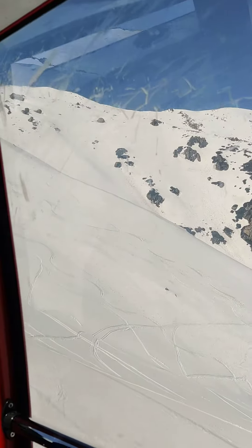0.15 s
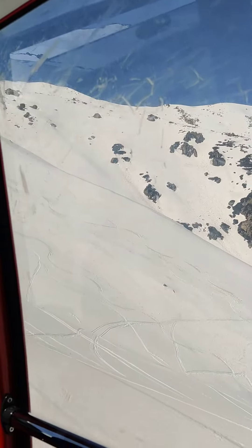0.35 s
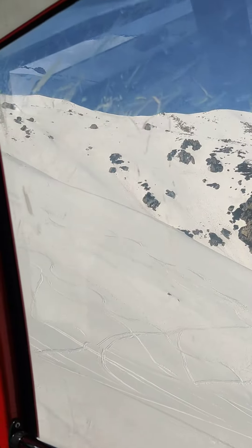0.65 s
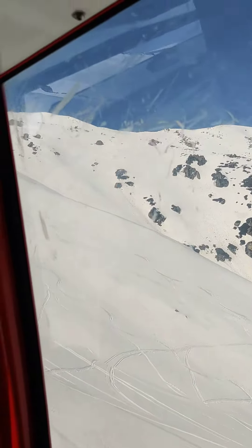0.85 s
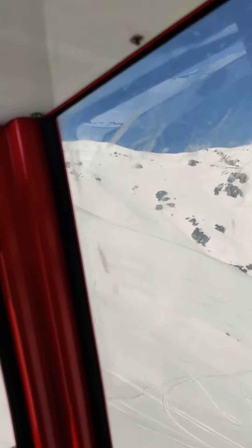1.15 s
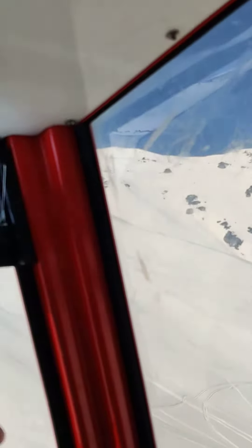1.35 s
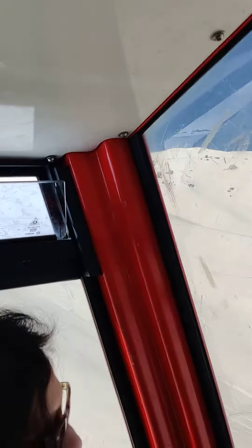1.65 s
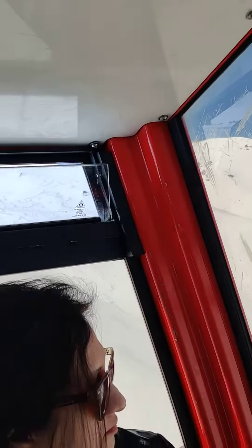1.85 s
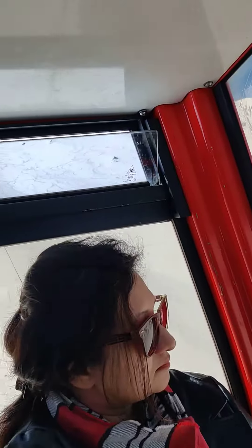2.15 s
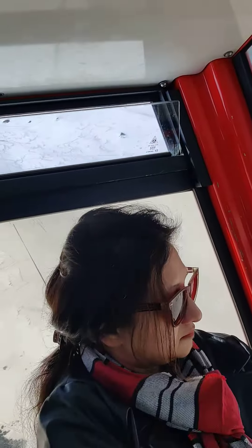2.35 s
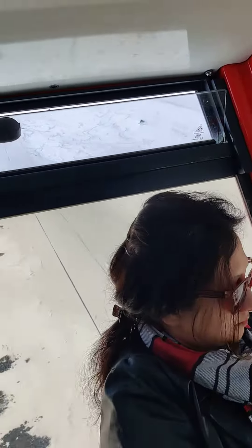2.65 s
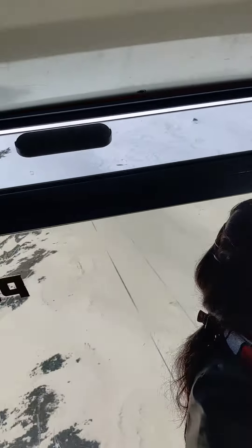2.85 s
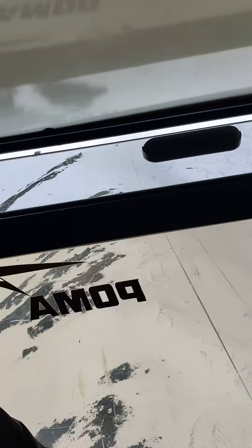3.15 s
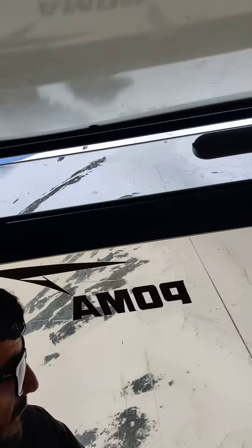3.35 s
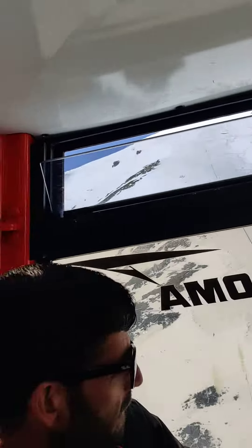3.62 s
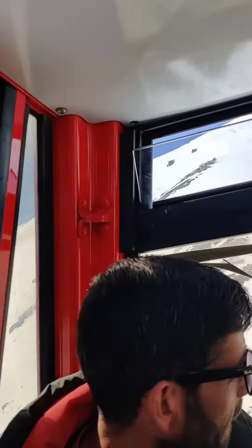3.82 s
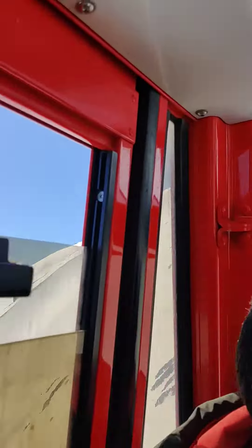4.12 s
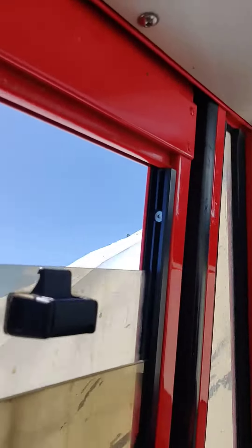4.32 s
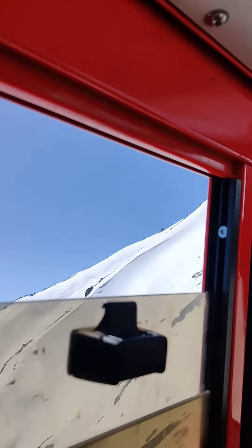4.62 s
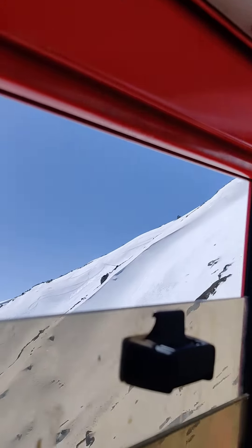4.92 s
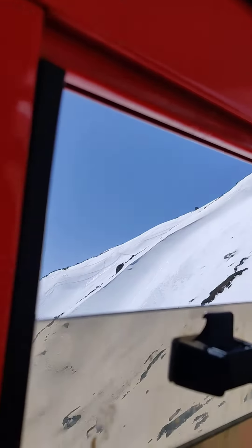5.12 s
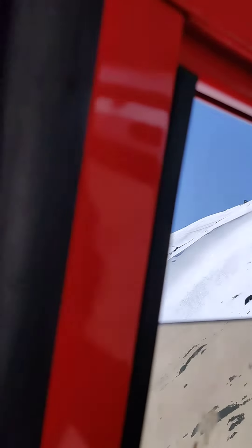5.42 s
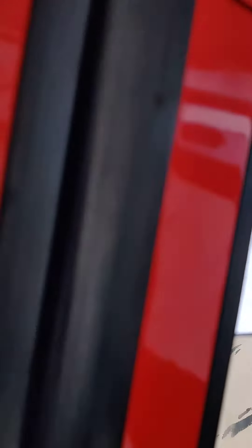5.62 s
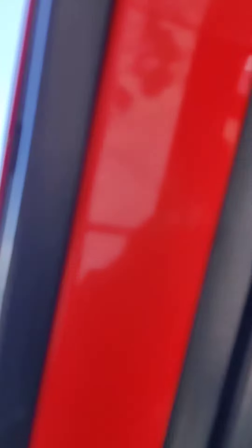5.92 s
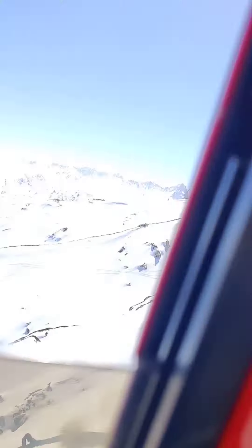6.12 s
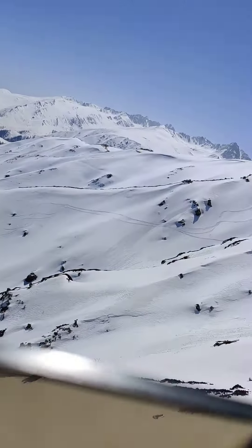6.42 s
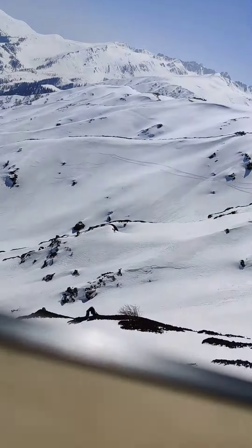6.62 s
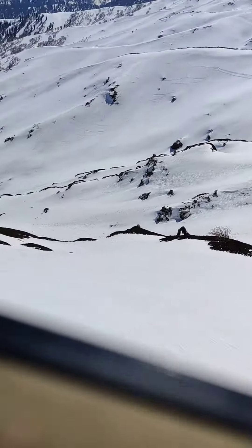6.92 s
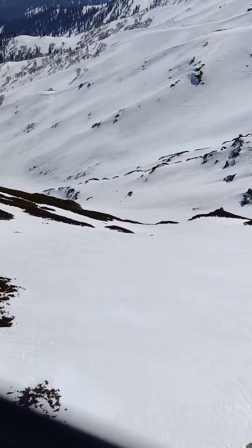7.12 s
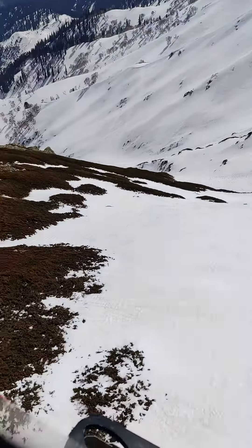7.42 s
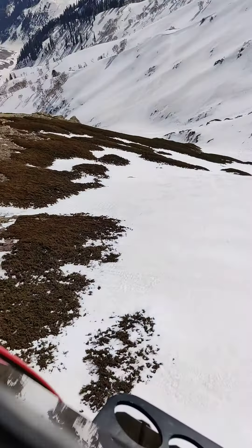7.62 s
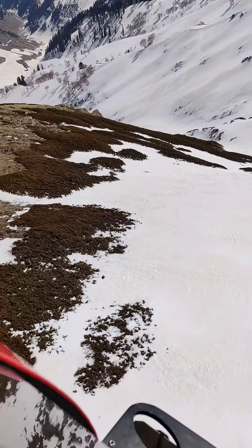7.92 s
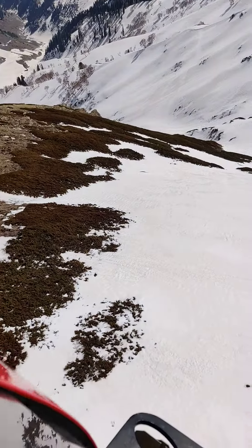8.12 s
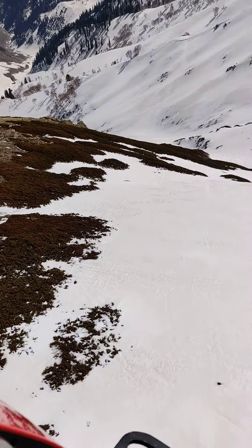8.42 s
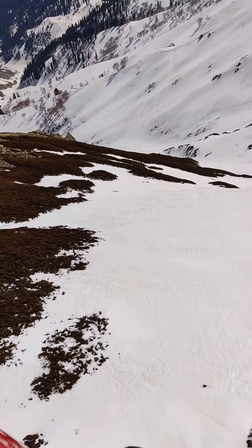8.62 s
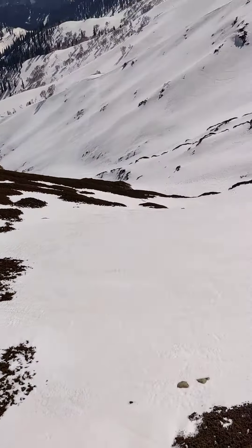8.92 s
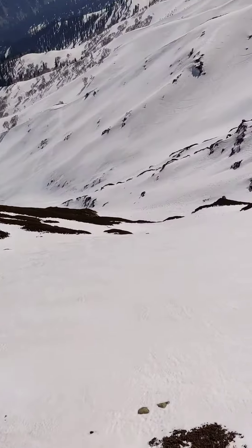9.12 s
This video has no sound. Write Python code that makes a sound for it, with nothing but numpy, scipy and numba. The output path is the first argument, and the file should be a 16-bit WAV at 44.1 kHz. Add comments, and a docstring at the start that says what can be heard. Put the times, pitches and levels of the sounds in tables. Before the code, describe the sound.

Low droning cabin hum pulsing almost three times a second, with close cloth rubs, small clicks, faint buzzing and late dull wind buffets.

```python
"""A deep hum throbs once a wheel turn, over a rumble of panels, inside a cable car cabin: the strands of the
rope running over the tower wheels shake it. Faint overtone lines sing above. Close to the phone's two microphone
ports jackets rustle, tick and whistle: filtered noise. The loose pane buzzes, knocked in step with the hum;
later the phone is held out of the window, where wind thumps, soft pushes of noise, on its left port."""
import sys
import numpy as np
from scipy import signal
from scipy.fft import dct
from scipy.io import wavfile
from scipy.ndimage import uniform_filter1d, minimum_filter1d
from numba import njit

SR = 44100
rng = np.random.default_rng(int(sys.argv[2]) if len(sys.argv) > 2 else 0)


def inscribe(sig):
    """Save sig as 16-bit PCM at rate SR to the path in sys.argv[1].

    A 1-D sig is mono; a 2-D sig holds one channel per row.
    Samples are clipped to [-1, 1] before scaling.
    """
    pcm = np.round(np.clip(np.atleast_2d(sig).T, -1, 1) * 32767)
    wavfile.write(sys.argv[1], SR, pcm.astype(np.int16))


N = 408366
OPPOSITE = np.array([[1], [-1]])  # left and right in opposite sense


def undb(db):
    """Decibels to gain."""
    return 10 ** (np.asarray(db) / 20)


def unit(x):
    """Scaled to rms 1."""
    return x / np.sqrt(np.mean(x ** 2))


def curves(table):
    """The columns of a table, after its times, as sample-rate lines."""
    s, *columns = np.transpose(table)
    return [np.interp(np.arange(N) / SR, s, c) for c in columns]


def band(x, hz, width):
    """A fixed resonance."""
    return signal.lfilter(*signal.iirpeak(min(hz, .45 * SR), hz / width, SR), x)


def walk(rate):
    """Random levels held 1 / rate s and slewed twice; spread near 1."""
    hold = int(SR / rate)
    steps = np.repeat(rng.standard_normal(N // hold + 1), hold)
    return 1.3 * uniform_filter1d(uniform_filter1d(steps, hold), hold)[:N]


def pan(x, db):
    """Left and right, db apart."""
    return x * undb(np.array([db, -db]) / 2)


def shaken(modes, apart, flicker_db):
    """Steep resonances driven by noise, each flickering alone; apart = share that differs between the ports."""
    out = 0
    for hz, width, db in modes:
        mid, side = (unit(band(band(rng.standard_normal(N), hz, width), hz, 1.41 * width)) for _ in range(2))
        out = out + undb(db + flicker_db * walk(3)) * (mid + apart * side * OPPOSITE)
    return unit(out)


# the rope hum in the cabin: time_s, level_db, throb_depth_db (gain of the side lines)
HUM = [(0, -11.5, -3), (.45, -13, -13.5), (.7, -7, -20), (1.0, -7, -14.5), (1.3, -8, -14), (2.2, -8.5, -9),
       (2.5, -6.5, -17), (2.8, -4, -18), (3.2, -7, -11), (3.7, -7, -10.5), (4.2, -8.5, -12.5),
       (4.6, -5.5, -17), (4.9, -10, -10.5), (5.35, -9, -14.5), (5.57, -14, -9), (5.8, -10, -8),
       (6.3, -8.5, -16.5), (7.0, -10.5, -11.5), (7.6, -11, -16), (8.35, -12, -13.5), (8.65, -15, -13),
       (9.17, -17, -16), (9.21, -19.5, -18), (9.26, -46, -15)]
# side lines that the uneven wheel adds: wheel_turns away from the hum (rounded when played), share
WHEEL_LINES = [(-1, 1), (-1.5, 0.18), (-3, 0.069), (1, -0.39)]
# the phone turning its right port to the cabin: time_s, left_minus_right_db of the hum (other layers scale it)
TURN = [(0, -3), (4.5, -2), (6.0, -4.5), (7.2, -8), (8.1, -11), (9.26, -11)]
# the rope surges and slackens: the hum's pitch swings slowly about its mean
HUM_HZ, SURGE_HZ, SURGE_PERIOD_S, FASTEST_S = 72.83, .52, 4.9, .15
WHEEL_TURNS_PER_S, THROB_ANCHOR_S = 2.703, 0.439
# the throb drifts ahead and behind
WHEEL_LEAD_TURNS, WHEEL_LEADS_MOST_S, WHEEL_LEAD_PERIOD_S = 0.13, 5.3, 4.44


def hum():
    """One strand per cycle: a near sine with a rough skirt, throbbing with the wheel. Also gives the cycles."""
    t = np.arange(N) / SR
    db, throb_db = curves(HUM)
    hz = HUM_HZ + SURGE_HZ * np.cos(2 * np.pi * (t - FASTEST_S) / SURGE_PERIOD_S)
    cycles = np.cumsum(hz + .3 * walk(14)) / SR
    lead = WHEEL_LEAD_TURNS * np.cos(2 * np.pi * (t - WHEEL_LEADS_MOST_S) / WHEEL_LEAD_PERIOD_S)
    wheel = 2 * np.pi * (WHEEL_TURNS_PER_S * (t - THROB_ANCHOR_S) + lead)
    skirt = unit(band(band(rng.standard_normal(N), 72, 19), 72, 19))
    lag = .07 * walk(1.3) * OPPOSITE  # radians: now one port leads, now the other
    strand = 2 * np.pi * cycles + lag
    sides = sum(share * np.sin(strand + round(turns) * wheel) for turns, share in WHEEL_LINES)
    tone = np.sqrt(2) * (np.sin(strand) - undb(throb_db) * sides) + undb(-20.5) * skirt
    return tone * pan(undb(db), curves(TURN)[0]), cycles


# levels of the cabin's parts: time_s, sway_db (below the hum), panels_db (just above the hum),
# upper_panels_db (before a fixed trim), roof_db
RUMBLE = [(0, -24, -28, -39.5, -52.5), (.9, -24, -28, -38.5, -46.5), (1.6, -23, -24, -39.5, -50.5),
          (2.3, -23.5, -25, -39, -51.5), (2.7, -26, -34.5, -37.5, -53), (3.3, -26.5, -31.5, -36.5, -53.5),
          (4.0, -27, -35.5, -39, -53), (5.0, -29.5, -35, -35.5, -50.5), (5.5, -29, -38, -36.5, -52),
          (6.0, -27.5, -38, -35, -48), (6.7, -27.5, -39, -37.5, -51), (7.6, -29.5, -35, -38, -53.5),
          (9.26, -30.5, -41, -42, -48.5)]
# resonances of the swaying cabin: pitch_hz, width_hz, relative_level_db
SWAY = [(31.3, 37.3, -0.5), (40, 27, -5)]
# resonances of the panels just above the hum: pitch_hz, width_hz, relative_level_db
PANELS = [(88, 37, -4.5), (118.7, 12, -8), (128.8, 10, -1.5)]
# resonances of the upper panels: pitch_hz, width_hz, relative_level_db
UPPER_PANELS = [(183, 20, -4), (200, 30, -11), (258, 58, -2.5), (294.7, 33, -5.5), (362.5, 42, -10.5),
                (444.3, 45, -11.5)]
# resonances of the roof: pitch_hz, width_hz, relative_level_db
ROOF = [(491.5, 40, 2), (541, 57, -4), (585, 46, -7), (695, 62, -15.5), (775.5, 52, -12.5)]


def rumble():
    """The cabin sways and its panels ring, as noise in resonances; it turns to the right port as the hum does."""
    sway_db, panel_db, upper_db, roof_db = curves(RUMBLE)
    turn_db, = curves(TURN)
    sway = undb(sway_db) * shaken(SWAY, apart=0.16, flicker_db=2.0)
    panels = undb(panel_db) * shaken(PANELS, apart=0.1, flicker_db=2.5)
    upper = undb(upper_db - 2.5) * shaken(UPPER_PANELS, apart=0.49, flicker_db=3.0)
    roof = undb(roof_db) * shaken(ROOF, apart=0.49, flicker_db=2.5)
    return pan(sway + panels, 1.4 * turn_db) + pan(upper + roof, 0.8 * turn_db)


# narrow lines above the hum, each louder for one spell:
# pitch_hz, width_hz, level_db (of the tone, outside the spell), spell_middle_s, spell_half_length_s, spell_gain_db
SINGING = [(144.44, 9, -38, 7.1, .8, 5), (225.2, 7, -51, 4.5, 1.2, 13.5), (291.2, 10, -50, 1.7, 2.1, 9),
           (364.4, 14, -58.5, .7, 0.42, 9), (437.5, 7, -56, 3.57, 0.27, 7.5)]


def singing():
    """Narrow lines above the hum: a wavering tone in a little band of noise."""
    out, t = 0, np.arange(N) / SR
    for hz, width, db, middle, half, spell_db in SINGING:
        cycles = np.cumsum(hz + 0.2986 * width * walk(9)) / SR
        tone = np.sqrt(2) * np.sin(2 * np.pi * cycles) * undb(2.0 * walk(6))
        spell = np.exp(-((t - middle) / half) ** 4)
        level_db = db + spell_db * spell + 1.2 * walk(4) + 3.2 * walk(13)
        noise = shaken([(hz, width, 0)], apart=0.12, flicker_db=0.1)
        out = out + undb(level_db) * (tone + .45 * noise)
    return pan(out, 0.56 * curves(TURN)[0])


# jackets rubbing, one row a rub: loudest_s, rise_s, fall_s, hiss_db, swish_db
# (swish is the hollow sound of the sleeves; both levels are before the fixed gains in rustle)
RUBS = [(.23, 0.15, 0.6, -56, -58.5), (.54, 0.12, 0.06, -54, -57.5), (.72, 0.11, .3, -54.5, -57.5),
        (.95, .1, 0.069, -57.5, -59), (1.13, .06, .1, -56, -61), (1.35, 0.44, .3, -59, -59.5),
        (1.54, .22, .25, -51, -54), (1.95, 0.68, 1, -53, -57), (2.31, 0.018, 0.17, -47.5, -50),
        (2.43, .08, 0.073, -53, -58), (3.03, 0.2, 0.38, -49.5, -51.5), (3.36, 0.087, 0.039, -52, -51),
        (3.69, 0.13, 0.12, -53.5, -53.5), (3.86, .15, 0.19, -50, -53), (4.1, 0.18, 0.32, -46.5, -49.5),
        (4.33, 0.17, .1, -51, -53), (4.64, 0.25, 0.15, -53, -54), (5.02, 0.19, 0.25, -56.5, -57),
        (5.92, 0.42, 0.37, -60, -61), (6.26, .08, 0.053, -63, -64), (6.62, .2, 0.43, -55.5, -56.5),
        (6.85, 0.066, 0.33, -53.5, -52.5), (7.06, 0.079, 0.18, -47.5, -53.5), (7.3, 0.22, 0.28, -58, -55.5),
        (7.56, 0.26, 0.2, -52.5, -54.5), (7.72, 0.15, .08, -57, -58), (8.1, 0.23, 0.42, -59.5, -58.5),
        (8.5, .3, 0.63, -63, -60), (9.0, .1, .3, -70.5, -61.5)]
RUB_SWELL_DB = 10  # fall over one rise or fall time
STILL_HISS_DB, STILL_SWISH_DB = -67.5, -70  # between rubs, before the same gains


def rubbing():
    """Gain of the hiss and of the swish: each rub swells to its peak and dies away."""
    t, hiss, swish = np.arange(N) / SR, undb(STILL_HISS_DB), undb(STILL_SWISH_DB)
    for s, rise, fall, hiss_db, swish_db in RUBS:
        away = np.maximum((s - t) / max(rise, .005), (t - s) / max(fall, .005))
        shape = undb(-RUB_SWELL_DB * away)
        hiss = np.hypot(hiss, shape * undb(hiss_db))
        swish = np.hypot(swish, shape * undb(swish_db))
    return hiss, swish


def rustle():
    """Cloth on cloth: dense noise grains and a hollow band, unrelated at the ports but swelling together."""
    hiss_gain, swish_gain = rubbing()
    swell = undb(1.1 * walk(25) + 0.87 * walk(60))
    # some 300 grains a second, a few much stronger
    strength = undb(np.minimum(3.9 * rng.exponential(size=N), 14.5))
    crackle = np.where(rng.random(N) < 300 / SR, strength, 0)
    grains = rng.standard_normal((2, N)) * (1 + 6.3 * uniform_filter1d(crackle, size=24))
    hiss = unit(signal.sosfilt(signal.butter(2, 2400., "high", fs=SR, output="sos"), grains))
    upper_hollow = band(band(grains, 2050, 2500), 2050, 3600)
    lower_hollow = band(band(grains, 980, 900), 980, 1500)
    swish = unit(upper_hollow + undb(-1.0) * lower_hollow)
    hiss = pan(hiss * hiss_gain * undb(10.0), .7 * curves(TURN)[0] + 3.1)
    return swell * (hiss + swish * swish_gain * undb(2.5))


# ticks of zips and seams: start_s, peak_db, centre_hz, width_hz, ring_s (60 dB fall of the noise), left_minus_right_db
TICKS = [(.1726, -45, 9050, 9000, 0.017, 0), (.2249, -41.5, 9000, 6000, 0.14, -16),
         (.3546, -42, 3350, 60, 0.06, -6), (0.355, -43, 4100, 503, .04, -11),
         (.385, -41, 7000, 9000, .02, -2), (2.3016, -23.5, 6000, 9000, 0.068, 1),
         (2.616, -38.5, 9000, 8940, 0.018, -11), (3.4953, -32.5, 6020, 8900, 0.035, -3.5),
         (3.6701, -36, 7000, 6030, 0.022, 7), (4.055, -35, 5000, 8000, .02, 1),
         (4.389, -32.5, 7000, 9000, .02, -5), (4.4339, -37, 8500, 2500, .02, -2.5),
         (4.5875, -35, 6950, 8900, .02, -1), (4.874, -37.5, 9030, 9000, 0.022, -1.5),
         (5.269, -39, 8050, 9000, 0.015, -4), (5.394, -56, 3000, 4000, 0.025, 2),
         (5.4628, -46, 2500, 3020, 0.067, -4), (6.8338, -34, 2200, 5000, 0.018, -13),
         (6.8865, -32, 1900, 3000, 0.029, -7), (6.9417, -39, 5400, 1200, .02, -6),
         (7.006, -33, 1000, 1500, 0.023, -3), (7.046, -39, 2500, 6000, 0.023, -7),
         (7.3453, -30, 7100, 5000, 0.018, -3), (7.524, -26.5, 7300, 2970, 0.02, -5),
         (7.75, -32, 12500, 4000, .015, -5), (7.817, -46, 3800, 2000, .015, 0),
         (7.823, -31, 6960, 9000, 0.022, -4), (7.8641, -33.5, 11000, 6000, 0.014, -8),
         (7.8953, -37.5, 5500, 4000, 0.017, -7), (7.8955, -41, 3030, 503, .03, -2),
         (7.969, -49, 2120, 108.5, 0.033, -6), (8.0008, -45.5, 5100, 900, 0.032, 0),
         (8.1732, -32.5, 5500, 8000, 0.042, -3)]


def ticks():
    """Each a sharp click with a short burst of noise behind it, ringing in its own band."""
    out, t = np.zeros((2, N)), np.arange(SR // 8) / SR
    for s, db, hz, width, ring, pan_db in TICKS:
        blow = rng.standard_normal((2, len(t))) * np.exp(-np.log(1000) * t / max(ring, .003))
        blow[:, 0] = 4.1  # the click
        burst = band(band(blow, hz, max(width, 50)), hz, np.clip(2.5 * width, 150, 12000))
        at = int(s * SR)
        out[:, at:at + len(t)] += burst / np.abs(burst).max() * undb([[db + pan_db / 2], [db - pan_db / 2]])
    return out


@njit
def svf(x, hz, width):
    """State-variable band-pass with a moving centre, gain 1 there."""
    y, b, l = np.empty(len(x)), 0., 0.
    for i in range(len(x)):
        g, k = np.pi * hz[i] / SR, width / hz[i]
        g += g * g * g / 3  # near tan(g)
        v = (b + g * (x[i] - l)) / (1 + g * (g + k))
        b, l, y[i] = 2 * v - b, l + 2 * g * v, k * v
    return y


# folds of cloth that whistle as they slide: start_s, end_s, from_hz, to_hz, width_hz (of the first filter), level_db
FOLDS = [(1.399, 2.3, 2070, 2180, 400, -61.5), (2.297, 2.5, 2280, 2190, 480, -62),
         (2.99, 3.42, 1200, 1400, 200, -59), (2.95, 3.2, 1900, 2070, 352, -57),
         (3.72, 4.12, 1220, 1520, 240, -55), (4.22, 4.382, 3200, 4200, 900, -53.5),
         (3.749, 4.195, 1700, 2350, 450, -54.5), (4.0, 4.348, 1600, 1950, 250, -57),
         (3.997, 4.2, 3100, 3300, 900, -52.5)]


def folds():
    """Each fold is a gliding band of noise that swells and stops."""
    out = np.zeros((2, N))
    for start, end, from_hz, to_hz, width, db in FOLDS:
        at, size = int(start * SR), int((end - start) * SR)
        hz = np.linspace(from_hz, to_hz, size)
        air = np.array([svf(svf(rng.standard_normal(size), hz, 1. * width), hz, 2. * width) for _ in range(2)])
        out[:, at:at + size] += unit(air) * signal.windows.tukey(size, .6) * undb(db)
    return out


# spells in which the loose pane buzzes, thin while heard from inside:
# start_s, end_s, level_db (of the ring before its band is cut out), bottom_hz, top_hz
BUZZ = [(4.64, 4.8, -54, 2090, 2360), (4.846, 4.945, -54, 2080, 2350), (5.612, 5.78, -56.5, 1900, 2320),
        (5.622, 5.762, -62, 950, 1250), (5.808, 5.917, -59, 2060, 2310), (5.998, 6.093, -56.5, 1900, 2380),
        (8.08, 8.146, -56, 798, 2400), (8.163, 8.249, -55.5, 800, 3500), (8.25, 8.417, -54.5, 800, 7060),
        (8.411, 8.573, -55, 800, 7000), (8.622, 8.655, -58, 1240, 4000), (8.709, 8.828, -55.5, 1230, 6000),
        (8.927, 8.98, -55.5, 1250, 7000), (9.036, 9.155, -54.5, 1230, 7000),
        (9.192, 9.219, -50.5, 1240, 7000)]
# modes of the pane: pitch_hz, width_hz (before the filters widen it), relative_level_db, left_minus_right_db
PANE = [(1000, 150, 4.5, 5), (1121, 46, 5, 12.5), (1430, 82, -2.5, 8), (1794, 48, 1, 17),
        (1832, 110, -2, 3), (2070, 120, -2.5, 1), (2202, 70, 1, 6), (2350, 120, -8, 3), (2533, 79, 2.5, 7),
        (2570, 78, 1, 8.5), (2850, 160, -8, 3.5), (3200, 70, -4.5, -3), (3370, 81, -2.5, -2.5),
        (3860, 67, -12.5, 0), (4230, 130, -9, 0.5), (4800, 200, -8, 4.5), (5470, 120, -9.5, 5),
        (5740, 120, -9, 4.5)]


def buzz(cycles):
    """The pane chatters on its frame once a cycle of the hum, a knock and three fading bounces, and rings."""
    knocks = 0.025 * rng.standard_normal(N)
    at = np.flatnonzero(np.diff(np.floor(4 * cycles)))
    late, strong = rng.standard_normal((2, len(at)))
    strength_db = 2.5 * strong - 4 * (np.arange(len(at)) % 4)  # each bounce 4 dB weaker
    jittered = at + (.001 * SR * late).astype(int)
    knocks[np.clip(jittered, 0, N - 1)] += undb(strength_db)
    ring = np.zeros((2, N))
    for k, (hz, width, db, pan_db) in enumerate(PANE):
        mode = unit(band(band(knocks, hz, 1.3 * width), hz, 4.7 * width))
        # neighbouring modes swing in opposite sense, which fills the gaps between them
        ring += np.outer(undb([db + pan_db / 2, db - pan_db / 2]) * (-1) ** k, mode)
    ring = unit(ring)
    out = np.zeros((2, N))
    for start, end, db, low_hz, top_hz in BUZZ:
        span = slice(int(start * SR), int(end * SR) + 400)
        part = signal.sosfilt(signal.butter(3, [low_hz, top_hz], "band", fs=SR, output="sos"), ring[:, span])
        out[:, span] += part * signal.windows.tukey(part.shape[1], 800 / part.shape[1]) * undb(db)
    return out


# eddies of wind on the left port: time_s (near the peak), peak_db (before a fixed 4 dB gain),
# pitch_hz (sets the filters), ring_s
THUMPS = [(7.25, -21, 120, .1), (7.29, -16.5, 150, .1), (7.326, -17, 218, .07), (7.365, -19, 194, .1),
          (7.40, -17, 150, .1), (7.431, -19.5, 190, .08), (7.48, -18, 150, .08), (7.538, -18, 169, .07),
          (7.609, -15, 139, .1), (7.645, -18, 218, .07), (7.68, -21, 150, .08), (7.721, -26, 199, .06),
          (7.819, -22.5, 179, .07), (8.249, -16, 129, .08), (8.288, -18.5, 193, .08),
          (8.328, -17, 200, .08), (8.359, -20.5, 150, .08), (8.41, -21, 170, .08), (8.45, -25, 202, .07),
          (8.969, -29, 170, .07), (9.138, -22, 140, .07)]


def wind():
    """Each eddy is a soft, dull push of noise, nearly all of it on the left port."""
    out, t = np.zeros(N), np.arange(SR // 5) / SR
    for s, db, hz, ring in THUMPS:
        push = rng.standard_normal(len(t)) * t * np.exp(-np.log(1000) * t / ring)
        push = band(push, 0.53 * hz, 2.1 * hz)
        push = signal.sosfilt(signal.butter(3, 1.08 * hz, fs=SR, output="sos"), push)
        at = int(s * SR) - int(.2 * ring * SR)
        out[at:at + len(t)] += (push / np.abs(push).max() * undb(db + 4.0))[:N - at]
    return np.outer([1, .08], out)


def scene():
    """Everything at the two ports."""
    tone, cycles = hum()
    cabin = tone + rumble() + singing()
    cloth = rustle() + ticks() + folds()
    return cabin + cloth + buzz(cycles) + wind()


# colour of the left microphone port: pitch_hz, gain_db
LEFT_PORT = [(700, 1), (1500, 3.5), (3000, 1), (4700, 1.5), (5900, 6.5), (7000, -4.5), (8500, -14.5),
             (11000, -17), (16000, -17)]
# colour of the right microphone port: pitch_hz, gain_db
RIGHT_PORT = [(700, -1.5), (1300, 5.5), (2000, 6.5), (3000, 4), (6500, 0), (8700, 5), (10000, -0.5),
              (11500, -6.5), (16000, -8.5)]
CEILING, TOP_HZ = .88, 15680  # limiter level (full scale 1), upper edge of the phone's band


def record(dry):
    """Each port has its own treble resonance; a limiter holds the loudest swells; the phone cuts the top."""
    log_hz = np.log((np.arange(N) + 1) * SR / 2 / N)
    ports = []
    for port in (LEFT_PORT, RIGHT_PORT):
        hz, db = np.transpose(port)
        ports.append(undb(np.interp(log_hz, np.log(hz), db)))
    heard = dct(dct(dry, type=2, norm="ortho") * np.array(ports), type=3, norm="ortho")
    room_left = np.minimum(1, CEILING / (np.abs(heard).max(axis=0) + 1e-9))
    heard = heard * uniform_filter1d(minimum_filter1d(room_left, size=1400), size=1400)
    return signal.sosfilt(signal.ellip(10, .2, 45, TOP_HZ, fs=SR, output="sos"), heard)


dry = scene()
out = record(dry)
inscribe(out)
```